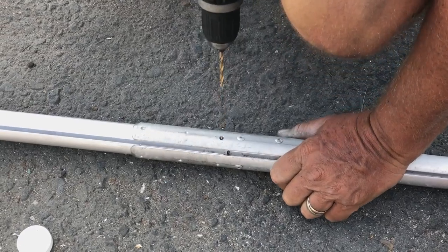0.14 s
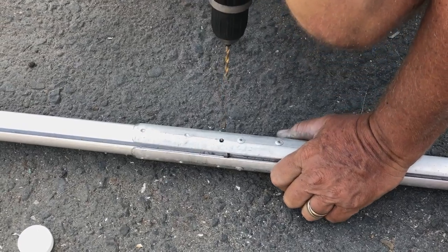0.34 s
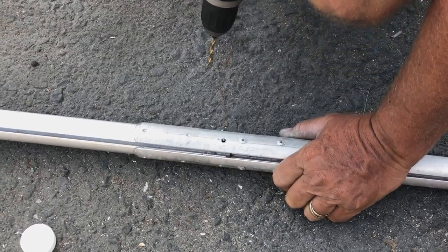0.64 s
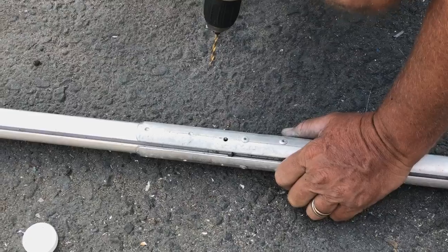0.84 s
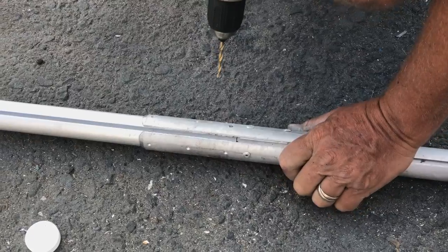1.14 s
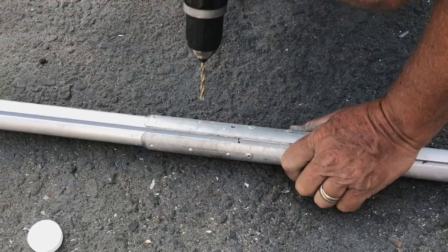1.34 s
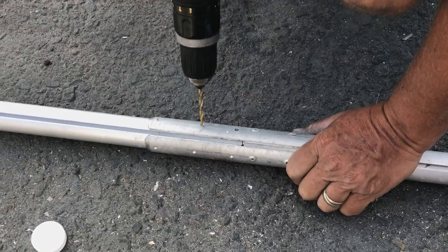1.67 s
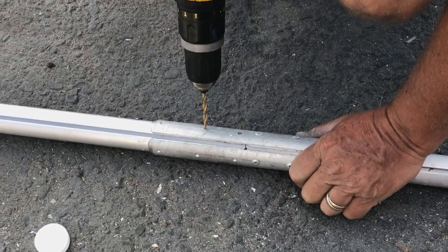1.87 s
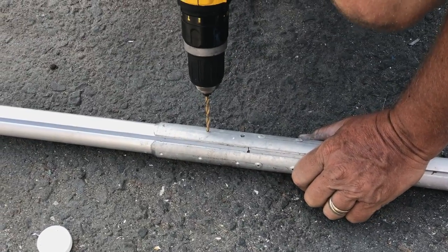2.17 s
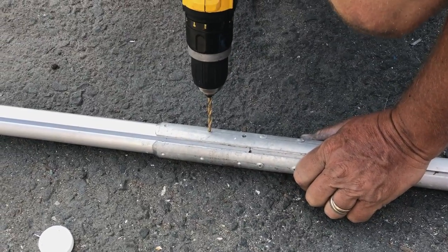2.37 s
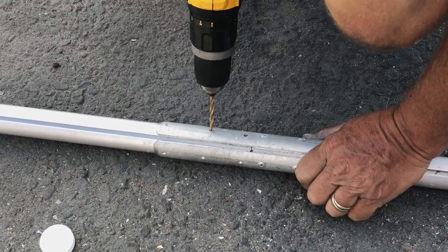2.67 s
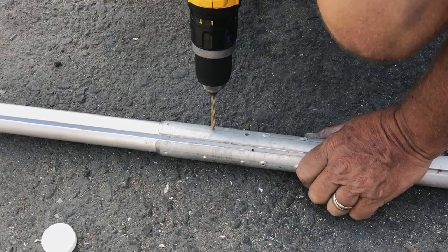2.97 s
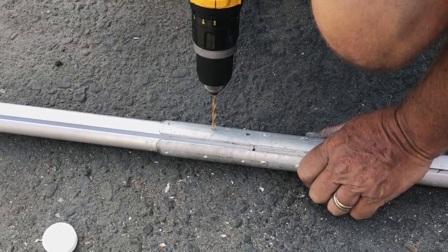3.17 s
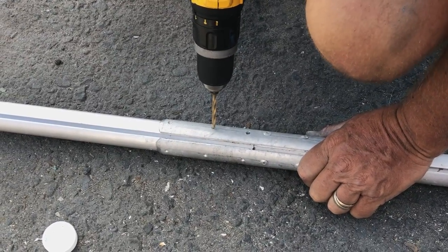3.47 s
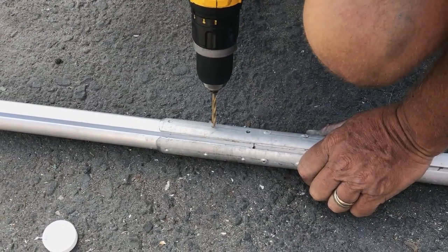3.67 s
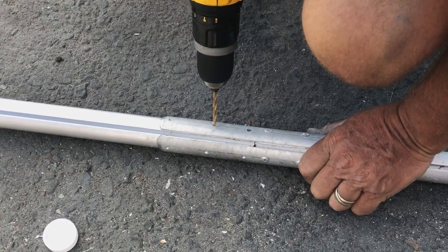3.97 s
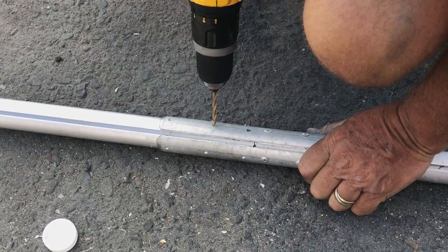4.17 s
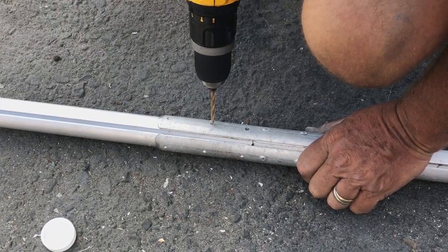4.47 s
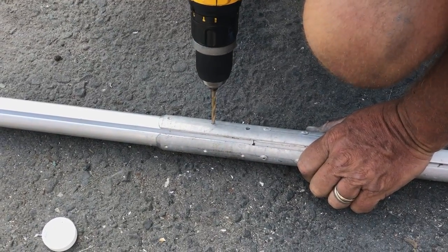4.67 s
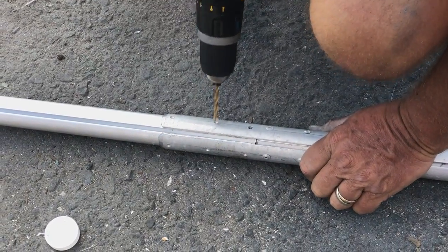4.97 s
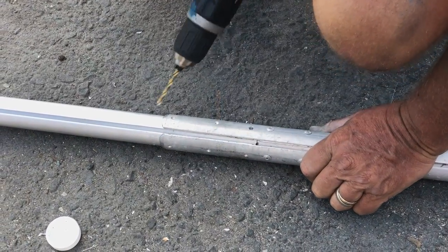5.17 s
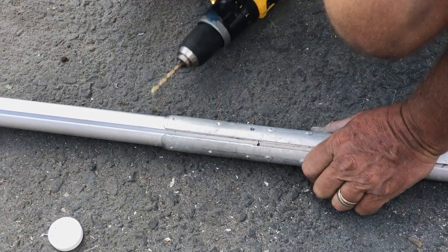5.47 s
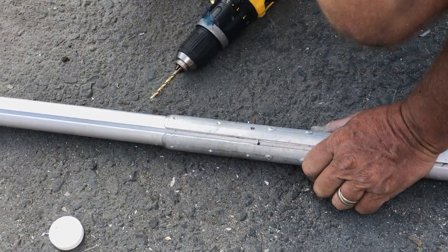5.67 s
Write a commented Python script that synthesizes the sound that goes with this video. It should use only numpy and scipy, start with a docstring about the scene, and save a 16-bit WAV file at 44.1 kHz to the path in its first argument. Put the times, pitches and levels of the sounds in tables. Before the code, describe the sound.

A quiet open yard with a distant engine's steady low hum and soft wash, heard close and dry, nearly centred. A brief scrape opens; dull handling bumps come around 0.35 s, then a cluster of damped metal tube knocks and rubs at 0.55-0.65 s. Single light taps follow near 1.2, 1.75 and 2.45 s. At 2.5 s a trigger clicks and a cordless drill spins up, its electric sing and sputter becoming a climbing gear whine. From 2.8 to 4.5 s the bit bores into aluminium: a loud broadband rasp with bright fizz, shifting metallic ringing and a slightly sagging whine, with irregular low puffs of air buffeting the microphone. The rasp drops out; the drill runs free, quieter, with more puffs around 4.65-4.75 s. At 4.95 s it brakes fast, pitch plunging with a tiny gear rattle. Faint clicks, taps and puffs follow at 5.25-5.75 s, and the hum returns at the end.

```python
"""A cordless drill spins up on an aluminium tube lying on a yard's asphalt, bores for under two seconds and brakes.
Gears and motor whine on multiples of the rotor speed, over the rush of fan and gears and the noise-made rasp of the bit.
Puffs of air, short filtered noise bursts, buffet the microphone; the tube knocks on decaying modes and scrapes.
A distant engine hums on steady tones in the yard's wash; both sink back from the drill's start and return just
before the end."""
import sys
import numpy as np
from scipy import signal
from scipy.fft import rfft, irfft, next_fast_len
from scipy.io import wavfile

SR = 44100
rng = np.random.default_rng(int(sys.argv[2]) if len(sys.argv) > 2 else 0)


def pcm_store(signal):
    """Save signal as 16-bit PCM."""
    levels = np.round(np.clip(np.atleast_2d(signal), -1, 1) * 32767)
    wavfile.write(sys.argv[1], SR, levels.astype(np.int16).T)


N = 257003
TIME = np.arange(N) / SR  # seconds

RASP_FROM_S, RASP_TO_S = 2.822, 4.5  # the bit is under load between these
BRAKE_S = 4.952

# The loud rasp of the bit, before its body, fizz and ring add up. Each row: time in seconds, level in dB.
RASP_LEVEL = [(2.845, -51), (3.485, -50.5), (3.705, -51.5), (3.723, -60), (3.905, -52), (4.127, -51),
              (4.269, -55), (4.433, -50.5), (4.48, -54)]
# Gusts of air on the microphone. Each row: middle in seconds, length in seconds, level in dB, brightness in Hz.
GUSTS = [(2.086, .012, -43.5, 220), (2.845, 0.022, -41, 298), (2.869, 0.019, -33, 364),
         (2.882, 0.014, -39, 310), (2.913, 0.0094, -33.5, 395), (2.92, 0.0079, -38, 330),
         (2.959, 0.0095, -33.5, 384.6), (2.97, 0.0075, -36.5, 386), (2.99, 0.0088, -40, 300),
         (3.039, 0.036, -43.5, 290), (3.083, 0.0083, -37.5, 310), (3.175, 0.026, -40.5, 287),
         (3.248, 0.0084, -36.5, 453), (3.273, 0.0099, -40, 346), (3.3, 0.018, -33, 384),
         (3.381, 0.022, -44.5, 338), (3.402, 0.0077, -38, 277), (3.51, 0.0069, -36.5, 377),
         (3.534, 0.077, -44.5, 318), (3.575, 0.0095, -41.5, 329), (3.583, 0.0078, -36.5, 380),
         (3.599, 0.012, -42.5, 282), (3.648, 0.0097, -45, 381), (3.68, 0.008, -34.5, 300),
         (3.688, 0.006, -34.5, 480), (3.705, 0.01, -31.5, 350), (3.716, 0.0086, -33.5, 378),
         (3.725, 0.0115, -31.5, 505), (3.76, 0.013, -48, 328), (3.815, .011, -41, 275),
         (3.857, .008, -41.5, 340), (4.0, 0.0089, -46, 320), (4.023, 0.022, -38, 364),
         (4.053, 0.0048, -32.5, 430), (4.089, 0.014, -39, 377), (4.122, 0.0073, -36.5, 347),
         (4.152, 0.029, -35, 364), (4.171, 0.0072, -30.5, 410), (4.182, 0.0073, -32.5, 420),
         (4.2, 0.0095, -33.5, 423), (4.218, 0.025, -37.5, 402), (4.241, 0.0082, -31.5, 396),
         (4.289, 0.0236, -37.5, 350), (4.329, 0.044, -40.5, 308), (4.384, 0.013, -37.5, 347.8),
         (4.414, 0.023, -39, 330.3), (4.466, 0.012, -32, 406.8), (4.49, 0.015, -34.5, 387),
         (4.595, 0.022, -56, 282), (4.643, 0.013, -37, 485), (4.658, 0.015, -31, 480),
         (4.671, 0.014, -32.5, 467), (4.686, 0.02, -34, 364), (4.697, 0.012, -44, 250),
         (4.731, 0.0055, -30.5, 616), (4.747, 0.0095, -32.5, 453), (4.833, 0.0045, -52, 330),
         (4.868, 0.0072, -44, 326), (5.077, 0.0081, -56, 300), (5.352, 0.0058, -46.5, 556),
         (5.368, 0.014, -43, 345), (5.384, 0.025, -50.5, 274), (5.552, 0.01, -46.5, 330),
         (5.564, 0.0085, -48.5, 215)]


def gain_of(db):
    """Decibels to amplitude."""
    return np.exp(np.asarray(db) * (np.log(10) / 20))


def evened(x):
    """Scales to an rms of 1."""
    return x / np.sqrt(np.mean(abs(x) ** 2) + 1e-20)


def curve(rows):
    """Joins rows of (seconds, value) by straight lines in time."""
    rows = np.asarray(rows, float)
    return np.interp(TIME, rows[:, 0], rows[:, 1])


def add(mix, s, sound):
    """Mixes a sound in at s seconds."""
    part = mix[max(round(s * SR), 0):][:len(sound)]
    part += sound[:len(part)]


def noise(colour):
    """Noise of rms 1 with the spectrum (Hz, dB per Hz), joined by straight lines over log frequency."""
    hz, db = np.transpose(colour)
    size = next_fast_len(N)
    bins_hz = np.fft.rfftfreq(size, 1 / SR)
    shape = gain_of(np.interp(np.log(bins_hz + 1), np.log(hz + 1), db))
    return evened(irfft(rfft(rng.standard_normal(size)) * shape, size)[:N])


def wander(rate_hz):
    """A smooth random curve of rms 1 that moves at up to rate_hz."""
    count = int(2 * rate_hz * N / SR) + 2
    fine = evened(signal.resample(rng.standard_normal(count), 8 * count))
    return np.interp(TIME, np.linspace(0, TIME[-1], len(fine)), fine)


def band(x, hz, kind, order=2):
    """A causal Butterworth filter."""
    sections = signal.butter(order, np.clip(hz, 10, SR / 2 - 10), kind, fs=SR, output="sos")
    return signal.sosfilt(sections, x)


def scrapes(grain_db=1.0, crackle_db=1.5):
    """Brief rubs of the tube and the stopping bit: noise with a grainy, crackling level, each under its own top."""
    # Each row: start in seconds, length in seconds, level in dB ahead of the low-pass, top in Hz.
    rubs = [(-.03, 0.075, -47.5, 14000), (0.033, 0.064, -55.5, 12000), (0.528, 0.031, -56.5, 5000),
            (0.593, 0.056, -58, 5000), (0.652, 0.034, -50.5, 2400), (4.95, 0.032, -59, 15000),
            (5.451, 0.057, -56.5, 16000), (5.744, 0.019, -58, 12000)]
    # Spectrum of rubbed metal. Each row: frequency in Hz, level in dB per Hz.
    rub_colour = [(300, 7), (700, 10.5), (1300, 9.5), (2000, 1.5), (3100, -2), (4500, -13.5), (8000, -24.5),
                  (13000, -34), (15000, -32)]
    grain = evened(gain_of(grain_db * wander(150) + crackle_db * wander(340)))
    rub = grain * noise(rub_colour)
    out = np.zeros(N)
    for s, length, db, top_hz in rubs:
        arc = np.sqrt(np.sin(np.pi * np.clip((TIME - s) / length, 0, 1)) + 1e-12)
        out += gain_of(db) * arc * band(rub, top_hz, "low")
    return out


def yard(waver=0.34, drift=0.61, hum_db=-1, wash_db=-53.5, low_cut_hz=130):
    """Coloured noise for the wash, wavering sines for a distant engine's hum, and the breeze's low rumble."""
    # The wash of the surroundings ahead of the low cut. Each row: frequency in Hz, level in dB per Hz.
    wash_colour = [(15, -72), (25, -42), (42, -4), (69, -16), (227, -3), (457, -5.5), (523, -8),
                   (741, -8.5), (826, -11.5), (1140, -13.5), (1240, -14), (3830, -31.5), (5280, -40),
                   (13900, -58.5), (15500, -67)]
    # Tones of the distant engine. Each row: frequency in Hz, level in dB before hum_db is added.
    hum_tones = [(231.5, -62), (263.8, -67), (403.7, -69.5), (559.9, -68), (651.4, -70.5), (745, -63.5),
                 (869, -71.5), (952.8, -77.5), (1114, -67), (1696, -77.5)]
    # Gain of wash and hum, sinking as the drill starts and back just before the end.
    # Each row: time in seconds, gain in dB.
    yard_gain = [(0, 1), (2.57, 0), (2.7, -9), (5.0, -11), (5.22, -13.5), (5.42, -10.5), (5.64, -9),
                 (5.76, 2.5)]
    hum = np.zeros(N)
    for hz, db in hum_tones:
        tone = np.sin(2 * np.pi * hz * TIME + drift * wander(4))  # drift is in radians
        hum += gain_of(db + hum_db) * (1 + waver * wander(5)) * tone
    wash = gain_of(wash_db) * band(noise(wash_colour), low_cut_hz, "high")
    rumble = noise([(20, -64), (45, -26), (70, -6.0), (130, -1.5), (220, 0.5), (500, -38.5), (1500, -69)])
    breeze = breeze_level() * gain_of(2.9 * wander(15)) * rumble
    return gain_of(curve(yard_gain)) * (np.sqrt(2) * hum + wash) + breeze


def breeze_level(calm_db=-73, under_gust_db=-25, linger_s=0.036):
    """The rumble's amplitude: powers add up from calm, a few swells and a weaker swell under every gust."""
    # Swells of the breeze's rumble. Each row: middle in seconds, half length in seconds, level in dB.
    breeze_swells = [(.36, 0.034, -56), (1.36, 0.11, -62), (1.6, 0.19, -59), (2.02, 0.23, -59.5),
                     (2.42, 0.053, -62), (5.76, 0.064, -55.5)]
    under_gusts = [(middle, linger_s, db + under_gust_db) for middle, _, db, _ in GUSTS]
    t = TIME[::64]  # coarse steps suffice for so slow a curve
    power = gain_of(calm_db) ** 2
    for middle, half_s, db in [*breeze_swells, *under_gusts]:
        power = power + gain_of(db) ** 2 * np.exp(-((t - middle) / half_s) ** 2)
    return np.interp(TIME, t, np.sqrt(power))


def thuds(half_s=0.0048):
    """Soft, dull bumps of handling: a cycle or two of low pressure."""
    # Each row: middle in seconds, peak of the envelope in dB, pitch in Hz.
    bumps = [(0.33, -46, 126), (0.3475, -35.5, 151), (0.39, -44, 180), (0.411, -51, 130)]
    out, t = np.zeros(N), np.arange(-.03, .03, 1 / SR)
    for s, db, hz in bumps:
        bump = np.exp(-(t / half_s) ** 2) * np.cos(2 * np.pi * (hz * t + rng.random()))
        add(out, s + t[0], gain_of(db) * bump)
    return out


def knocks(crack=1.12, crack_s=0.004, focus_db=17, rise_s=0.00026):
    """A blow rings the tube, damped by the hand; modes far from its centre, in octaves, speak less."""
    # Knocks of tube and drill. Each row: start in seconds, peak in dB, frequency the contact excites most in Hz.
    blows = [(0.579, -31, 930), (0.582, -34, 3060), (.589, -34.5, 940), (.598, -47, 1820),
             (0.623, -40, 1000), (1.1635, -44.5, 2430), (1.1645, -43, 1250), (1.726, -49.5, 2200),
             (1.7613, -37, 1840), (2.463, -46.5, 950), (5.2605, -48, 2950), (5.2633, -51.5, 1960),
             (5.421, -56.5, 1900), (5.512, -45, 1800)]
    # Modes of the tube. Each row: frequency in Hz, relative level in dB, time to fall by 60 dB in seconds.
    tube_modes = [(671, 1.5, 0.079), (950, 4, 0.054), (1056, 4, 0.048), (1310, 8, 0.023), (1743, 5, 0.041),
                  (1886, -4, 0.037), (2300, -32, 0.019), (2530, 0.5, 0.033), (2950, -5, 0.0089),
                  (2770, -1.5, 0.04), (3020, 5, 0.02), (3280, -9, 0.071), (4130, -13, 0.045),
                  (6600, -24, .025)]
    out, t = np.zeros(N), np.arange(SR // 6) / SR
    for s, peak_db, centre_hz in [*blows, *brake_rattle()]:
        ring = np.zeros(len(t))
        for hz, level_db, t60 in tube_modes:
            mode_db = level_db - focus_db * abs(np.log2(hz / centre_hz)) - 60 * t / t60
            ring += gain_of(mode_db) * np.sin(2 * np.pi * (hz * t + rng.random()))
        grit = rng.standard_normal(len(t))
        grit = evened(band(grit, [centre_hz * 0.79, centre_hz * 0.81], "band", order=1))
        grit = band(grit, 6200, "low")  # the contact is too soft to excite the top treble
        blow = (ring + crack * np.exp(-t / crack_s) * grit) * (1 - np.exp(-t / rise_s))
        add(out, s, gain_of(peak_db) * blow / abs(blow).max())
    return out


def eddy(length, db, hz, width=0.29, skirt_s=0.012, skirt=0.14, low_cut_hz=165, top=1.603):
    """A brief burst of pressure in a longer swirl; the microphone's low cut makes its bass lag."""
    t = np.arange(-.05, .05, 1 / SR)
    core = np.exp(-(t / (width * length)) ** 2 / 2)  # width is a share of the eddy's length
    swirl = core + skirt * np.exp(-(t / skirt_s) ** 2 / 2)
    burst = band(swirl * rng.standard_normal(len(t)), top * hz, "low", order=5)
    burst = band(burst, hz * 0.54, "low", order=1)
    burst = band(burst, low_cut_hz, "high", order=3)
    window = np.hanning(300)  # the level is that of the strongest 7 ms or so
    strongest = signal.fftconvolve(burst ** 2, window / window.sum()).max()
    return gain_of(db) * burst / np.sqrt(strongest)


def puffs(edge_db=-4, gap_s=0.0121, spread_db=0.5, scatter=0.148, stray_scatter=0.388):
    """A short gust is one eddy, a long one a loose train, strongest in its middle; weak strays come while boring."""
    stray_gap_s, stray_db, stray_spread_db, stray_hz = 0.025, -52.5, 1.5, 281
    eddies = []
    for middle, length, db, hz in GUSTS:
        count = max(round(length / gap_s), 1)
        for k, (late, size) in enumerate(rng.standard_normal((count, 2))):
            place = (k + .5 + scatter * late) / count - .5  # about -0.5 to 0.5 through the gust
            eddy_db = db + edge_db * (2 * place) ** 2 + spread_db * size
            eddies.append((middle + place * length, length / count, eddy_db, hz))
    for s in np.arange(RASP_FROM_S + stray_gap_s, RASP_TO_S - stray_gap_s, stray_gap_s):
        late, size = rng.standard_normal(2)
        eddies.append((s + stray_scatter * stray_gap_s * late, gap_s, stray_db + stray_spread_db * size, stray_hz))
    out = np.zeros(N)
    for s, length, db, hz in eddies:
        burst = eddy(length, db, hz)
        centre = np.average(np.arange(len(burst)), weights=burst ** 2) / SR  # where its energy balances
        add(out, s - centre, burst)
    return out


def rotor_speed(start_s=2.495, spin_up_per_s2=850, knee=16, brake_length_s=0.068, jitter=0.00061):
    """Turns per second: a steady climb that levels off, a slight tremble, and a quick brake."""
    # Speed once under way, sagging as the bit bites. Each row: time in seconds, speed in turns per second.
    running = [(2.86, 253.7), (2.9, 260.7), (3, 269.5), (3.08, 272.4), (3.18, 272.3), (3.27, 265.9),
               (3.38, 260.3), (3.5, 257.3), (3.55, 254.8), (3.72, 255.5), (3.83, 253.7), (3.93, 254.4),
               (4, 252.6), (4.08, 255.7), (4.15, 253.9), (4.22, 254.7), (4.28, 252.3), (4.34, 253.4),
               (4.39, 251.6), (4.46, 253.6), (4.51, 251.3), (4.58, 253.3), (4.66, 251.2), (4.73, 253.3),
               (4.82, 250), (4.89, 253.8)]
    climb = spin_up_per_s2 * np.maximum(TIME - start_s, 0)
    speed = climb / (1 + (climb / curve(running)) ** knee) ** (1 / knee)
    brake = np.exp(-(np.maximum(TIME - BRAKE_S, 0) / brake_length_s) ** 2)
    return speed * brake * (1 + jitter * wander(16))


def rush(speed, full_db=-60, speed_power=1):
    """Coloured noise of the cooling fan and gears, growing with speed."""
    # Each row: frequency in Hz, level in dB per Hz.
    rush_colour = [(530, -47), (900, -6.5), (1230, -1), (1520, -7.5), (1650, 1.5), (2000, -5.5),
                   (2120, -4.5), (3030, -9), (3380, -6.5), (4080, -5.5), (4390, -19), (5700, -14),
                   (7680, -17), (10600, -25.5), (11600, -22.5), (12200, -25), (12650, -26), (13800, -33),
                   (15500, -28)]
    return gain_of(full_db) * (speed / speed.max()) ** speed_power * noise(rush_colour)


def loaded(edge_s=0.0077):
    """1 while the bit rasps, else 0, with short ramps between."""
    return np.clip(np.minimum(TIME - RASP_FROM_S, RASP_TO_S - TIME) / edge_s, 0, 1)


def trigger(on_s=2.51, off_s=2.654, fade_s=0.054, widen_s=0.085, chopper_hz=3941):
    """The speed control chops the current: the windings sing at its rate and two overtones, then under the whine."""
    # levels in dB of the switching rate, its double and its triple
    start_db, free_db, loaded_db = (-70, -68, -86), (-79, -80, -99), (-65, -75, -95)
    gate = np.clip((TIME - on_s) / .004, 0, 1) * np.clip((off_s - TIME) / fade_s, 0, 1)
    # as the pulses widen, the lowest tone takes over
    wide = np.exp(-((TIME - off_s + widen_s / 2) / widen_s) ** 2) * (TIME > on_s)
    free = (TIME > RASP_TO_S) * np.clip((BRAKE_S - TIME) / fade_s, 0, 1)
    out = np.zeros(N)
    for k, start in enumerate((wide, gate, gate)):
        level = start * gain_of(start_db[k]) + free * gain_of(free_db[k]) + loaded() * gain_of(loaded_db[k])
        out += level * np.sin(2 * np.pi * (k + 1) * chopper_hz * TIME)
    return np.sqrt(2) * out


def ticks(rise_s=0.0012, decay_s=0.0059):
    """Dry, bright clicks of the drill's trigger, chuck and casing: quickly decaying noise."""
    # Each row: start in seconds, level in dB before rise and decay.
    clicks = [(2.524, -60), (2.542, -66), (5.2595, -63.5), (5.43, -71), (5.455, -67), (5.5125, -64.5),
              (5.542, -70), (5.73, -63), (5.75, -62)]
    # Each row: frequency in Hz, level in dB per Hz.
    click_colour = [(600, -14), (1800, 2), (3200, 5), (4500, 0.5), (6500, -4), (9500, -12), (13000, -21),
                    (15500, -20)]
    envelope, t = np.zeros(N), np.arange(SR // 20) / SR
    for s, db in clicks:
        add(envelope, s, gain_of(db) * (1 - np.exp(-t / rise_s)) * np.exp(-t / decay_s))
    return envelope * noise(click_colour)


def sparks(turns, middle_s=2.62, half_s=0.037, level_db=-57.5, segments=5, grain_db=3):
    """The brushes sputter under the starting current, one spit for each commutator segment that passes."""
    # Each row: frequency in Hz, level in dB per Hz.
    spark_colour = [(900, -18), (1800, -2), (3300, 6), (4400, 2), (6000, -7), (8000, -22), (15000, -31)]
    spits = evened(np.exp(-3 * (segments * turns % 1)) * gain_of(grain_db * wander(120)))
    swell = np.exp(-((TIME - middle_s) / half_s) ** 2)
    return gain_of(level_db) * swell * spits * noise(spark_colour)


def whine_level(speed, silent_hz=55, audible_hz=90):
    """The gears sing once they turn fast enough, far louder under load, and ease off afterwards."""
    base_free_db, base_loaded_db, follows = -65, -51, 0.59  # follows: the share taken of the rasp's swings
    bite_db, bite_s = -7.5, 0.094  # the whine starts this much lower and swells as the bit takes hold
    ease_db_per_s, release_s, release_db_per_s = 7, 4.92, 90
    swing_db = curve(RASP_LEVEL) - np.median(np.array(RASP_LEVEL)[:, 1])
    bite = np.exp(-np.maximum(TIME - RASP_FROM_S, 0) / bite_s)
    loaded_db = base_loaded_db + follows * swing_db + bite_db * bite
    free_db = base_free_db - ease_db_per_s * np.maximum(TIME - RASP_TO_S, 0)
    # the whine sinks as the finger leaves the trigger
    free_db = free_db - release_db_per_s * np.maximum(TIME - release_s, 0)
    level_db = free_db + loaded() * (loaded_db - free_db)
    return gain_of(level_db) * np.interp(speed, [silent_hz, audible_hz], [0, 1])


def whine(speed, turns, flutter=0.15, rough=0.3, swell_db=0.77, full_speed_hz=252):
    """Tones locked to the rotor; uneven teeth make each flutter, load shifts their balance, the housing lifts some."""
    # Tones of motor and gearbox, as multiples of the rotor speed: the gear mesh, its half, overtones
    # and sidebands, a close pair that beats, the motor's slots.
    orders = [5.8, 6.8, 10, 11.65, 12.65, 13.6, 14.6, 15.6, 16.495, 16.552, 18.75, 20.4, 22.3, 26, 27.2, 30,
              31, 32.16, 34, 40.8, 46, 50]
    # Their relative levels in dB while gathering speed, under load, and running free afterwards.
    starting_levels = [-13.5, -20, -24, -22, -15.5, -1.5, -12.5, -17, -20, -23, -20, -24, -21, -18, -15.5,
                       -22, -27, -25, -22, -25, -30, -28]
    loaded_levels = [-26.5, -10, -17, -20, -16.5, -1, -19, -8.5, -10.5, -13.5, -19, -18.5, -18, -20, -22,
                     -16, -27, -19.5, -27, -30, -25, -28]
    free_levels = [-12.5, -6.5, -26, -17, -18, -1.5, -12, -14, -13, -10.5, -15, -17.5, -26, -19, -21, -18,
                   -22, -28, -33, -32, -22, -23]
    # Slot tones under load, rising over the first half second, weaker again late.
    # Each row: time in seconds, gain in dB.
    slot_gain = [(2.85, -6), (3.2, 0), (3.36, 1), (3.55, 0.5), (3.85, 0), (4.12, 0), (4.28, -3), (4.45, -1)]
    # Resonances of the housing. Each row: frequency in Hz, width in Hz, lift in dB.
    housing = [(1325, 220, 12.5), (1900, 48, 8.5), (2100, 180, 10.5), (2500, 140, 1), (3080, 260, 3.5),
               (3960, 88, 8.5), (4500, 140, 1.5), (5080, 90, 1), (5800, 320, 1.5), (7760, 400, 9.5)]
    slots_from_order, gear_mesh = 30, 13.6  # gear_mesh: tooth contacts per rotor turn
    # slow gears run less evenly, in phase (radians of the mesh tone) and in strength
    backlash_rad, stutter_db = 0.8, 4.5
    strain_db = 3.5  # the starting torque makes them louder while they are slow

    on = speed > 1  # only while the rotor turns
    speed, turns, load = speed[on], turns[on], loaded()[on]
    starting = TIME[on] < RASP_TO_S - .5
    slowness = np.clip(1 - speed / full_speed_hz, 0, 1) ** .5
    uneven = np.maximum(slowness, .5 * starting * (1 - load))
    backlash = backlash_rad * uneven * wander(110)[on]
    slots_db = curve(slot_gain)[on]
    out = np.zeros(N)
    for order, starting_db, loaded_db, free_db in zip(orders, starting_levels, loaded_levels, free_levels):
        unloaded_db = np.where(starting, starting_db + strain_db * slowness, free_db)
        pressed_db = loaded_db + slots_db * (order >= slots_from_order)
        db = (1 - load) * unloaded_db + load * pressed_db
        db = db + stutter_db * uneven * wander(55)[on] + swell_db * wander(5)[on]
        for centre, width, lift in housing:
            db = db + lift / (1 + (2 * (order * speed - centre) / width) ** 2)
        phase = 2 * np.pi * order * turns + rough * wander(60)[on] + backlash * order / gear_mesh
        out[on] += gain_of(db) * (1 + flutter * wander(30)[on]) * np.sin(phase)
    return np.sqrt(2) * out


def gear_buzz(turns, level_db=-9, centre_order=16, octaves=1.46, uneven_db=4, carrier_turns=5):
    """Flaws of the teeth repeat with each turn of the planet carrier: a dense comb of faint tones."""
    order = np.arange(1, 2050) / carrier_turns  # carrier_turns: rotor turns per turn of the carrier
    hump = np.exp(-(np.log2(order / centre_order) / octaves) ** 2 / 2)
    size = hump * gain_of(uneven_db * rng.standard_normal(len(order)))
    cycle = evened(irfft(size * np.exp(2j * np.pi * rng.random(len(order)))))
    place = turns / carrier_turns % 1 * len(cycle)
    return gain_of(level_db) * np.interp(place, np.arange(len(cycle)), cycle)


def rasp(turns, throb=0.035, grain_db=0.34):
    """Broad friction noise and restless metal resonances, throbbing with each rotor turn, the fizz slightly wide."""
    # Spectra of the body and of the treble fizz. Each row: frequency in Hz, level in dB per Hz.
    body_colour = [(200, -23), (700, -6.5), (1300, -5.5), (1700, 1.5), (1950, -3.5), (2150, 1.5),
                   (3000, -1), (3750, 2), (4300, -3.5), (4700, -2.5), (7000, -15.5)]
    fizz_colour = [(3500, -50), (4600, -41), (5100, -13), (5650, 1), (6000, 1.5), (6550, 4.5), (7000, -1),
                   (7800, 1), (8500, -5), (10300, -5.5), (12000, 3), (13500, -4), (15500, 1.5)]
    gate = loaded() * (1 + throb * np.sin(2 * np.pi * turns)) * gain_of(grain_db * wander(200))
    body = noise(body_colour)
    fizz = noise(fizz_colour) + .1 * np.outer([1, -1], noise(fizz_colour))  # opposite left and right
    return gate * gain_of(curve(RASP_LEVEL)) * (body + fizz + cutting_ring())


def cutting_ring(swell_db=2.5, drift_hz=22):
    """Narrow metallic bands that the cutting edges excite come and go, drifting as the bit's grip changes."""
    # Resonances of bit and tube. Each row: frequency in Hz, width in Hz, level in dB relative to the rasp's level.
    cutting_modes = [(1610, 100, -17), (2273, 170, -17.5), (2550, 120, -14), (3206, 160, -14.5),
                     (5060, 100, -24), (5500, 120, -16.5), (6360, 130, -16), (6510, 110, -15)]
    out = np.zeros(N)
    for hz, width, db in cutting_modes:
        phase = 2 * np.pi * np.cumsum(hz + drift_hz * wander(6)) / SR
        ring = gain_of(swell_db * wander(11)) * wander(width / 2) * np.sin(phase)
        out += gain_of(db) * evened(ring)
    return out


def drill(coast_fade_s=0.071):
    """One rotor speed drives whine, buzz, rush, sparks and the rasp's throb."""
    speed = rotor_speed()
    turns = np.cumsum(speed) / SR
    gears = whine_level(speed) * (whine(speed, turns) + gear_buzz(turns))
    motor = rush(speed) + trigger() + sparks(turns)
    # once the current is cut, the noise dies away
    coasting = np.exp(-np.maximum(TIME - BRAKE_S, 0) / coast_fade_s)
    return coasting * (gears + motor) + rasp(turns)


def brake_rattle(count=7, gap_s=0.0052, peak_db=-48.5, first_hz=2580, octaves=1.7, fall_octaves=0.147):
    """The gears clack in a quick run as they brake, tending lower; rows like those of the knocks."""
    rows = []
    for k, (late, tone) in enumerate(rng.uniform(-0.507, 0.46, (count, 2))):
        hz = first_hz * 2 ** (octaves * tone - fall_octaves * k)
        rows.append((BRAKE_S + (k + late) * gap_s, peak_db, hz))
    return rows


def scene():
    """Everything sits near the middle between left and right."""
    return scrapes() + yard() + thuds() + knocks() + puffs() + drill() + ticks()


def record(dry, edge_hz=15720):
    """The recorder's band limit."""
    low_pass = signal.firwin(511, edge_hz, window=("kaiser", 9), fs=SR)
    return signal.oaconvolve(dry, low_pass[None], "same", axes=1)


dry = scene()
out = record(dry)
pcm_store(out)
```